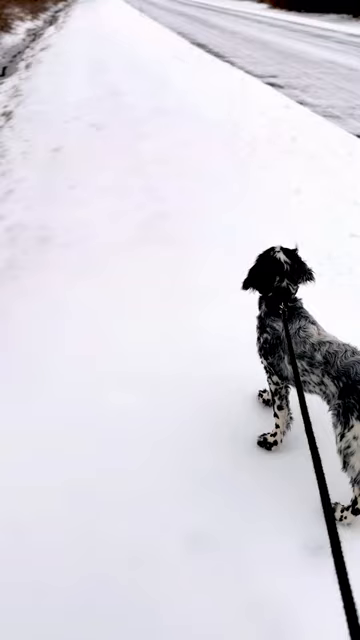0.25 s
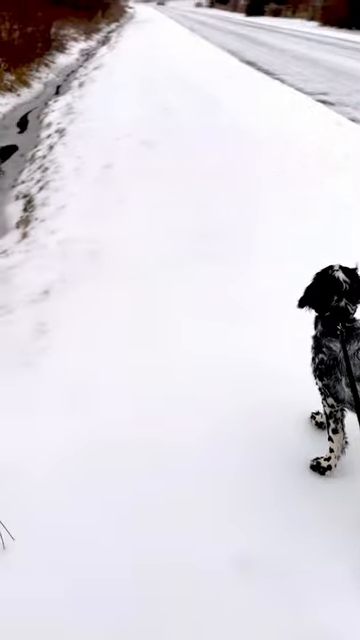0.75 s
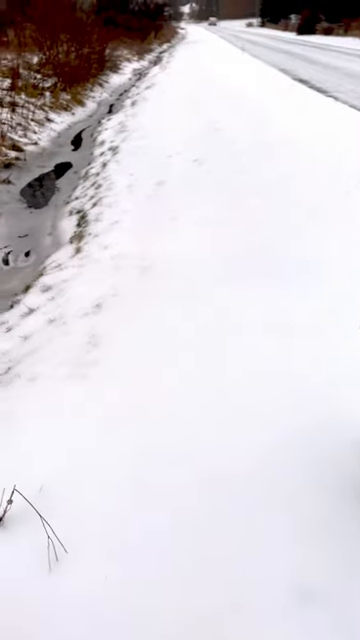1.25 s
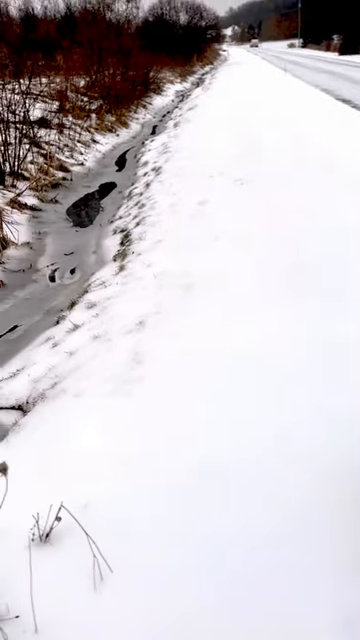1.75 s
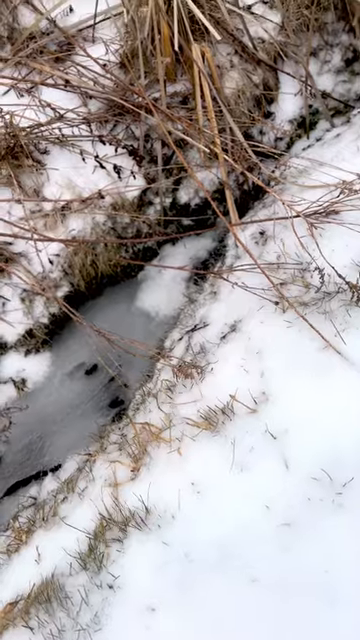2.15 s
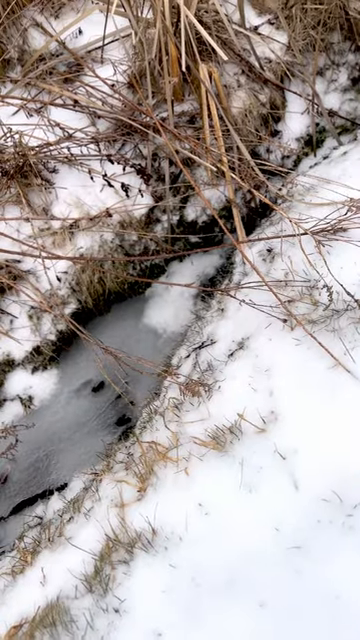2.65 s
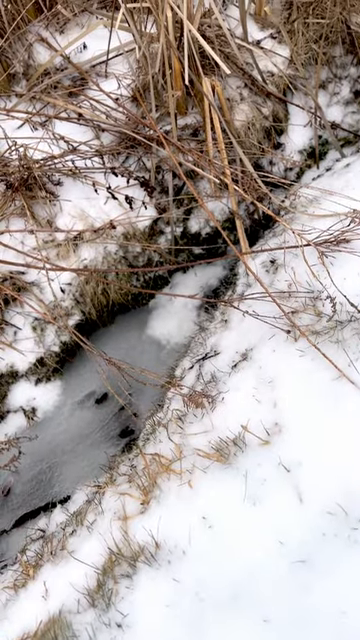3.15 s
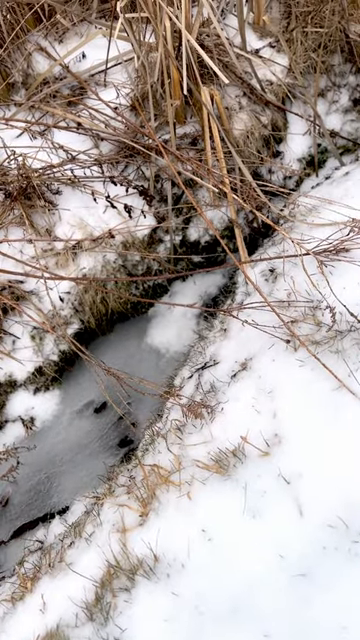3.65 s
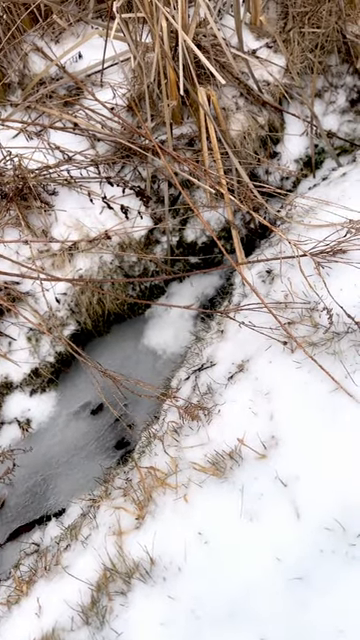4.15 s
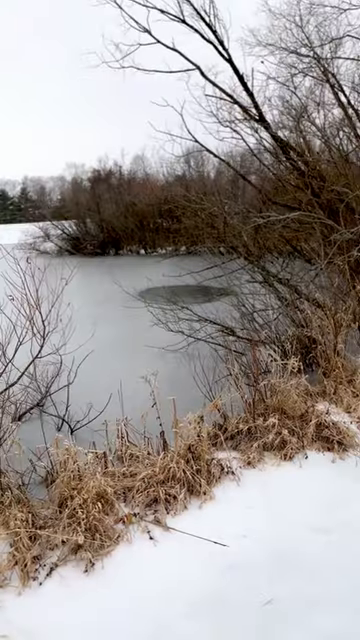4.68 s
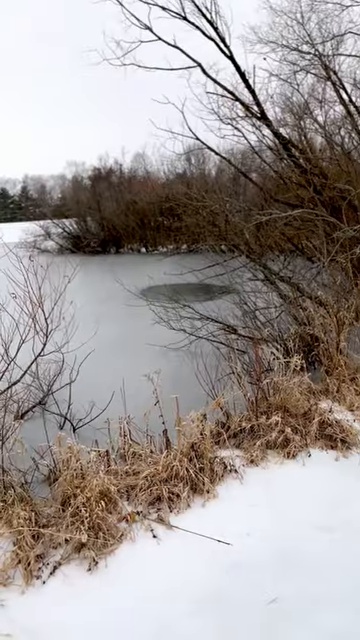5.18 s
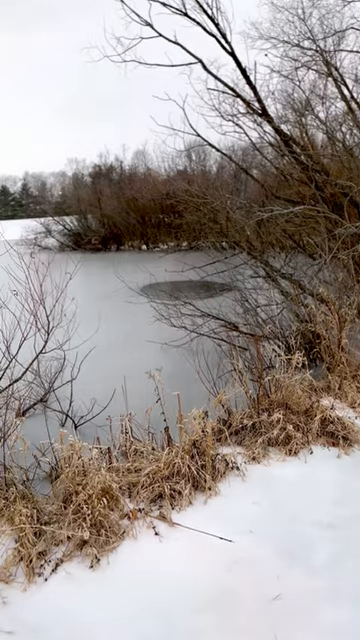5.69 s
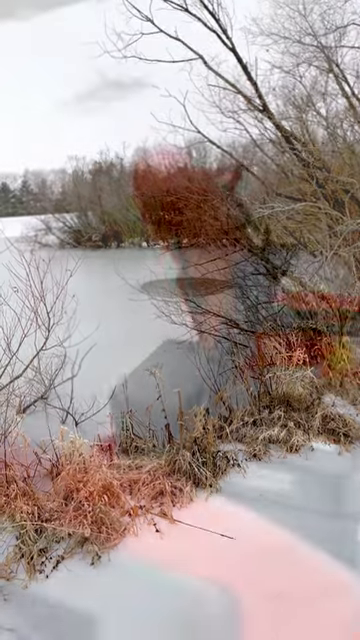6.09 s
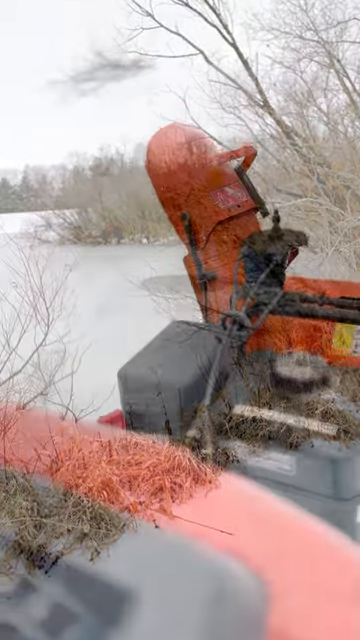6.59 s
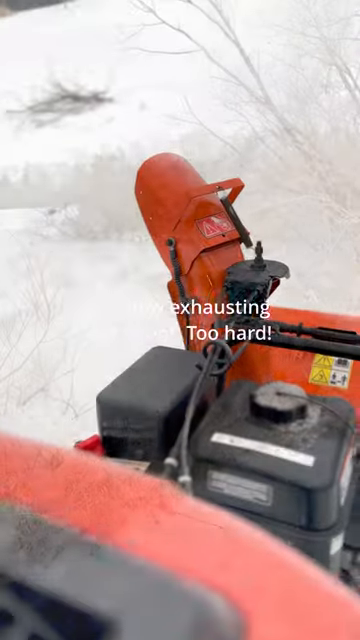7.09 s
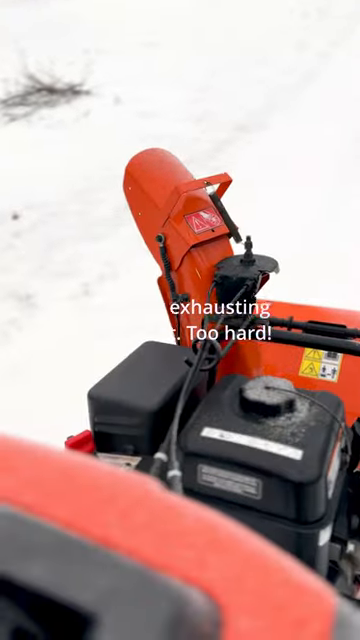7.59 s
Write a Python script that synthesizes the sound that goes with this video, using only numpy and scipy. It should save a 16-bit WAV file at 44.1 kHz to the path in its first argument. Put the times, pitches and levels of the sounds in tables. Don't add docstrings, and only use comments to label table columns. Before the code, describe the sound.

Low wind gusts and faint birds give way to busy water dripping, near silence with faint crunches, then an abrupt steady gasoline engine roar.

```python
import sys
import numpy as np
from scipy import signal
from scipy.fft import rfft, irfft, next_fast_len
from scipy.io import wavfile
from scipy.ndimage import uniform_filter1d

SR = 44100
rng = np.random.default_rng(int(sys.argv[2]) if len(sys.argv) > 2 else 0)


def field_ratio(decibels):
    return 10 ** (np.asarray(decibels, dtype=float) / 20)


def to_wav(sig):
    pcm = np.clip(np.atleast_2d(sig), -1, 1) * 32767
    pcm = np.round(pcm).astype(np.int16)
    wavfile.write(sys.argv[1], SR, pcm.T)


N = 345303
T = np.arange(N) / SR
CUTS_S = [
    1.822,
    4.318,
    6.5545,
]

EXHAUST_ORDERS_DB = [-48, -2.5, -5, -0.5, 0, 1, -4.5, 1.5, 1.5, -5, -23.5, -21.5, -21.5, -15, -12, -10.5,
                     -19.5, -17.5]
# frequency in Hz, level in dB.
ROAR = [(15, -28), (40, -16), (80, -17.5), (140, -4), (250, -7.5), (330, -23), (500, -41.5)]
# place in cycle 0-1, level in dB, width in cycle 0-1.
VALVES = [
    (.2, 3.5, 0.06),
    (.65, 2, 0.02),
    (.95, -0.5, .06),
]
# frequency in Hz, level in dB, t60 in seconds.
CASING = [
    (834, -9.5, 0.045),
    (955, -10.5, 0.05),
    (1486, -6, 0.015),
    (2200, -16.5, 0.045),
    (6400, -30, .01),
]
# rows of frequency in Hz, level in dB; level in dB; rows of frequency in Hz, left-right likeness.
CLATTER = ([(190, -27.5), (330, -5.5), (369, -7), (443, -4), (579, -10), (921, -8.5), (1110, -10.5),
            (1570, -11.5), (2920, -15.5), (3860, -21.5), (4910, -26), (5570, -25.5), (7070, -24.5),
            (8860, -33), (9600, -35), (12400, -79.5)], 0, [(100, 0.76), (300, 0.57), (500, 0.59),
            (2000, 0.55), (4000, 0.41), (5600, .99), (9000, 0.94)])
# frequency in Hz, level in dB.
FAN = [(8000, -40.5), (8700, -3), (10800, -3), (11500, -49)]
# rows of frequency in Hz, left minus right in dB; rows of frequency in Hz, left lead in rad.
ENGINE_PORTS = ([(60, 1.5), (120, -0.5), (250, 1.5), (510, 7.5), (1050, 5.0), (2160, 0), (4420, 2),
                 (9050, 0)], [(0, -0.5), (690, 1.0), (950, 0.34), (2150, -0.2), (3960, 7.5), (4910, 3.5),
                 (5510, 5.5), (8180, 7.5), (9220, 4)])


def engine():
    firings_per_s, sag_from_s, sag_per_s, first_firing_s = 30.6, 7.17, .45, 6.566
    exhaust_db, clatter_db = -19.6, -26.6
    span_s = CUTS_S[2], 9
    rate = firings_per_s - sag_per_s * np.maximum(T - sag_from_s, 0)
    turns = np.cumsum(rate) / SR
    turns -= turns[round(first_firing_s * SR)]

    order = np.arange(len(EXHAUST_ORDERS_DB)) + 1
    swing = np.where(order > 6, -1, 1)
    signed = np.r_[0, field_ratio(EXHAUST_ORDERS_DB) * swing, 0]
    orders = np.r_[0, order, order[-1] + 1]
    pulse = late_lows(lambda hz: np.interp(hz / rate.max(), orders, signed))
    firings = beats(turns, jitter_s=.0002, uneven_db=1.4)
    exhaust = evened(signal.oaconvolve(firings, pulse)[2048:][:N])

    swell_db, knocks = np.zeros(N), np.zeros(N)
    for place, db, width in VALVES:
        from_place = (turns - place + .5) % 1 - .5
        swell_db += db * np.exp(-from_place ** 2 / width ** 2)
        knocks += field_ratio(db) * beats(turns - place, jitter_s=.00008, uneven_db=1.8)
    roar = air(ROAR, -9.3, [(60, 1), (250, .97)], span=span_s, patchy_db=2.5, size=2048)
    low = field_ratio(exhaust_db) * (exhaust + field_ratio(-0.5) * roar * field_ratio(.7 * swell_db))

    body = np.zeros(4000)
    for hz, db, t60 in CASING:
        add(body, 0, field_ratio(db) * ring(hz, t60, rise=0.00028))
    casing = evened(signal.oaconvolve(knocks, body)[:N])
    clatter = air(*CLATTER, span=span_s, patchy_db=1.17, flicker_db=0.83, size=512)
    clatter = clatter * field_ratio(swell_db - swell_db.mean())
    heard = ports(low + field_ratio(clatter_db) * (clatter + field_ratio(-9.5) * casing), *ENGINE_PORTS)
    fan = air(FAN, -46.5, span=span_s, flicker_db=3.0, size=512) * [[1], [-1]]
    return (heard + fan) * during(*span_s)


def beats(turns, jitter_s, uneven_db):
    at = np.flatnonzero(np.diff(np.floor(turns)))
    chance = rng.standard_normal((len(at), 2))
    train = np.zeros(N)
    at = at + (jitter_s * SR * chance[:, 0]).astype(int)
    train[np.clip(at, 0, N - 1)] = field_ratio(uneven_db * chance[:, 1])
    return train


# start in seconds, peak in dB, pitch in Hz.
PLOPS = [(1.83, -40, 470), (1.862, -36.5, 436), (1.911, -34, 467), (1.973, -36.5, 460), (2.04, -32.5, 486),
         (2.099, -50, 500), (2.176, -30.5, 513), (2.213, -36.5, 510), (2.248, -44.5, 530),
         (2.285, -53, 493), (2.297, -49, 510), (2.332, -49, 506), (2.385, -54, 506), (2.402, -46, 460),
         (2.442, -45, 471), (2.476, -39, 472), (2.488, -32.5, 500), (2.544, -51, 535), (2.58, -30.5, 503),
         (2.631, -39.5, 458), (2.694, -32.5, 442), (2.733, -49, 470), (2.772, -34.5, 463),
         (2.831, -34.5, 480), (2.868, -28.5, 478), (2.937, -32.5, 452), (2.981, -44.5, 433),
         (3.003, -49, 450), (3.031, -34.5, 436), (3.065, -45, 441), (3.11, -33.5, 425), (3.17, -37, 633),
         (3.206, -37, 439), (3.243, -47, 450), (3.288, -38, 428), (3.301, -35, 484), (3.327, -41, 466),
         (3.413, -40.5, 497), (3.443, -44, 503), (3.573, -35.5, 530), (3.625, -45, 493), (3.675, -53, 440),
         (3.7, -49, 463), (3.726, -47.5, 476), (3.791, -47, 490), (3.82, -45, 495), (3.847, -29, 503),
         (3.929, -54, 487), (3.97, -39, 513), (4.031, -49, 450), (4.076, -56, 530), (4.112, -41, 662),
         (4.156, -51, 468), (4.224, -47, 536), (4.268, -48, 515)]
# start in seconds, peak in dB, pitch in Hz.
PLINKS = [(1.907, -54, 958), (2.036, -48.5, 994), (2.172, -48, 821), (2.294, -47.5, 1020),
          (2.477, -41, 1040), (2.568, -42.5, 1013), (2.624, -44.5, 985), (2.764, -40, 1260),
          (2.865, -39.5, 875), (3.027, -48.5, 942), (3.064, -49, 1200), (3.168, -52, 821),
          (3.243, -44, 1040), (3.299, -54, 816), (3.413, -39, 867), (3.491, -56, 1050),
          (3.547, -45.5, 1290), (3.57, -45, 834), (3.732, -42, 1270), (3.788, -49, 1100),
          (3.844, -39.5, 945), (3.926, -48.5, 900), (3.961, -49, 1220), (4.005, -54, 1010),
          (4.029, -49, 821), (4.11, -46, 850), (4.221, -48, 837), (4.256, -44, 1060)]
# start in seconds, peak in dB, pitch in Hz.
BEADS = [(1.8488, -50, 2090), (1.9196, -49.5, 2350), (1.9326, -44, 2280), (1.9954, -55, 2400),
         (1.9954, -49, 1730), (2.0992, -57, 2230), (2.1531, -53, 2260), (2.217, -49, 2230),
         (2.346, -50, 1720), (2.4833, -54, 2200), (2.5408, -54, 2420), (2.7258, -59, 2240),
         (2.7462, -57, 2230), (2.7627, -54, 1620), (2.8645, -53, 1720), (2.9024, -49, 2230),
         (2.928, -51, 1640), (2.9557, -53, 2280), (3.0016, -57, 2250), (3.051, -49, 2260),
         (3.2356, -48, 2270), (3.3035, -60, 1650), (3.3369, -58, 1540), (3.3718, -52, 2250),
         (3.385, -47, 2200), (3.4127, -37.5, 2180), (3.4711, -49, 1650), (3.5379, -55, 1700),
         (3.5526, -50, 1650), (3.5913, -54, 1660), (3.6896, -45.5, 1720), (3.729, -50, 1630),
         (3.816, -49.5, 1850), (3.8372, -44, 1820), (4.0064, -52, 1700), (4.254, -53, 2230)]
# start in seconds, peak in dB, pitch in Hz.
TICKS = [(1.9316, -48, 4280), (1.9321, -43, 2500), (2.0563, -52, 2720), (2.0982, -44, 3040),
         (2.171, -48, 4000), (2.2139, -49, 3250), (2.294, -57, 2970), (2.439, -46, 2940),
         (2.4813, -53, 2950), (2.5362, -49, 4330), (2.5412, -45, 2460), (2.5616, -45, 2870),
         (2.5901, -50, 3190), (2.7727, -43, 3440), (2.7804, -40.5, 3320), (2.8635, -55, 2770),
         (2.8744, -47, 2960), (2.8944, -47, 2920), (2.9358, -53, 2410), (2.9358, -48, 2810),
         (3.0336, -45, 2900), (3.0503, -42.5, 2760), (3.0874, -49, 2900), (3.1254, -51, 2900),
         (3.1428, -47, 2930), (3.168, -49, 2970), (3.207, -45.5, 3340), (3.2622, -44.5, 2950),
         (3.3144, -60, 3700), (3.3144, -52, 3320), (3.3474, -54, 3470), (3.3474, -43, 3800),
         (3.41, -52, 2700), (3.4476, -46, 3860), (3.4701, -49, 3480), (3.506, -47, 2950),
         (3.5484, -49, 3200), (3.5948, -53, 2690), (3.6577, -53, 2670), (3.6861, -43.5, 2490),
         (3.7027, -40.5, 2920), (3.8143, -54, 2690), (3.8426, -51, 2820), (3.8602, -50, 2920),
         (3.9265, -46, 3230), (4.0957, -47, 3230), (4.117, -49, 2440), (4.156, -48, 2920),
         (4.261, -40.5, 2950), (4.294, -41.5, 3250)]
# start in seconds, peak in dB, pitch in Hz.
SPRAY = [(1.8266, -45.5, 8080), (1.8837, -49, 4710), (1.912, -40, 5330), (1.9393, -42, 6110),
         (2.0104, -49, 6710), (2.0743, -44, 4700), (2.1638, -42.5, 7960), (2.2439, -45, 9000),
         (2.3222, -47, 4800), (2.3746, -55, 4840), (2.4025, -49, 4740), (2.4768, -49, 6300),
         (2.5372, -47, 5160), (2.5376, -45, 4900), (2.5941, -49, 5600), (2.7328, -45.5, 9260),
         (2.864, -41, 5600), (2.9358, -59, 5700), (3.065, -53.5, 4870), (3.135, -48, 9000),
         (3.1678, -45.5, 6100), (3.2151, -46, 5500), (3.2161, -35.5, 4770), (3.2351, -52, 5780),
         (3.2621, -42, 4880), (3.3015, -33.5, 8080), (3.3693, -50, 4850), (3.385, -47, 8440),
         (3.4127, -39.5, 8400), (3.5669, -47.5, 10800), (3.6008, -50, 6400), (3.6242, -51, 8350),
         (3.6382, -49, 5370), (3.6856, -46, 4380), (3.6856, -43.5, 9180), (3.704, -45, 7980),
         (3.724, -47, 7010), (3.7574, -42, 5970), (3.782, -49, 5700), (3.8846, -52, 6590),
         (3.8846, -45, 5170), (3.9235, -45, 5400), (4.0213, -50, 4840), (4.0368, -43, 4670),
         (4.1914, -51, 4860), (4.2603, -62, 4400), (4.2603, -46, 4780), (4.2728, -40.5, 9640)]
# rows of frequency in Hz, level in dB; level in dB; rows of frequency in Hz, left-right likeness.
DITCH_AIR = ([(120, -49), (200, -33), (309, -17.5), (486, -2.5), (600, -9), (1320, -14.5), (1480, -30),
              (1660, -16), (1950, -20), (2920, -11), (3400, -12.5), (4100, -26), (4900, -16.5),
              (5760, -19.5), (9500, -23), (12400, -34)], -58, [(100, .95), (500, 0.36), (3000, 0.55),
              (8000, 0.31)])
# rows of frequency in Hz, left minus right in dB; rows of frequency in Hz, left lead in rad.
DITCH_PORTS = ([(60, -8), (160, 3), (450, 0), (1220, -7), (3320, 1), (9050, 0.5)], [(0, 0.5), (780, 0.91),
                (1890, -0.7), (3700, -2), (4650, -1), (5770, -1), (7320, 1.4), (9220, -1.5)])


def ditch():
    overtone, overtone_db = 1.286, -6
    out = np.zeros(N)
    for s, db, hz in PLOPS:
        add(out, s, field_ratio(db + overtone_db) * ring(hz * overtone, 0.028, rise=0.0024))
        add(out, s, field_ratio(db - 1.1) * ring(hz, 0.032, rise=0.0021, glide=-0.026))
        add(out, s + 0.00918, field_ratio(db - 16) * ring(hz * 1.03, 0.065, rise=0.004))
    for s, db, hz in PLINKS + BEADS:
        add(out, s, field_ratio(db - 2.5) * ring(hz, 1.35 / hz ** .5, rise=0.0018, glide=0.027))
        add(out, s, field_ratio(db - 10) * puff(hz, 0.014, spread=0.5))
    for s, db, hz in TICKS:
        add(out, s, field_ratio(db - 3.0) * ring(hz, 0.032, rise=0.001))
        add(out, s, field_ratio(db - 9.5) * puff(hz, 0.014, spread=0.23))
    for s, db, hz in SPRAY:
        add(out, s - .001, field_ratio(db - 9.5) * puff(hz, 0.0065, spread=0.24))
        add(out, s, field_ratio(db - 7) * ring(hz, 0.015, rise=0.00048))
    wash = air(*DITCH_AIR, span=CUTS_S[:2], patchy_db=4.5, flicker_db=2.2, size=256)
    return ports(out + patter() + wash, *DITCH_PORTS) * during(*CUTS_S[:2])


def patter():
    level_db, drops_per_s = -65.5, 500
    first, last = (round(s * SR) for s in CUTS_S[:2])
    count = last - first
    size = field_ratio(6.9 * np.minimum(rng.exponential(1, count), 3.))
    size *= rng.random(count) < drops_per_s / SR
    kind = rng.integers(0, 16, count)
    out = np.zeros((2, N))
    for k, hz in enumerate(np.geomspace(420, 11500, 16)):
        grain = ring(hz, 13 / hz ** 0.81, rise=0.00023)
        grain *= field_ratio(read(DITCH_AIR[0], hz) + 2.9 * np.log2(hz / 1000))
        grains = signal.oaconvolve(size * (kind == k), grain)[:count]
        out[:, first:last] += np.array([grains, np.roll(grains, rng.integers(-4, 5))])
    return field_ratio(level_db) * evened(out)


# time in seconds, rumble in dB.
BREEZE = [(0, -47), (.7, -56.5), (1.55, -64), (1.82, -53.5), (4.3, -53.5), (5.15, -58), (5.21, -65.5),
          (6.55, -55.5)]
# middle in seconds, half length in seconds, rumble in dB, flutter over the rumble in dB.
GUSTS = [(0.035, 0.053, -37.5, -4), (0.131, 0.062, -35.5, -13.5), (0.229, 0.054, -35.5, -5),
         (0.32, 0.049, -40.5, -3), (0.432, 0.089, -40, -1), (1.124, 0.033, -42, -10),
         (1.229, 0.087, -42.5, -5.5), (4.38, 0.067, -45.5, -17), (4.553, 0.097, -38, -30),
         (4.81, .15, -38, -26), (5.07, 0.086, -42.5, -12.5)]
# frequency in Hz, level in dB.
RUMBLE = [(10, -43), (30, -7.5), (60, 7), (100, -2), (130, -6.5), (200, -78)]
# frequency in Hz, level in dB.
FLUTTER = [(70, -47), (120, 0.5), (170, -2.5), (260, -11.5), (400, -21.5), (700, -43), (1500, -83)]
# time in seconds, peak in dB, top in Hz.
THUMPS = [(.285, -25.5, 800), (3.415, -32, 1200), (4, -38.5, 230), (4.465, -34, 156), (4.68, -27, 233),
          (4.772, -32.5, 165), (5.083, -31.5, 240), (1.2, -39, 250), (.21, -34, 350)]


def wind():
    rumble = field_ratio(*curves(BREEZE))
    flutter = field_ratio(-9) * rumble
    for middle, half, db, bright_db in GUSTS:
        swell = field_ratio(db) * np.clip(1 - ((T - middle) / half) ** 2, 0, 1)
        rumble = rumble + swell
        flutter = flutter + field_ratio(bright_db) * swell
    near_mono = [(60, 0.99), (300, 0.95)]
    span_s = 0, CUTS_S[2]
    out = rumble * air(RUMBLE, 0, near_mono, span=span_s, patchy_db=1.5, size=4096)
    out += flutter * air(FLUTTER, 0, near_mono, span=span_s, patchy_db=3.5, flicker_db=4.5, size=1024)
    for s, db, top_hz in THUMPS:
        push = late_lows(lambda hz: (hz / 90) ** 2 / (1 + (hz / 90) ** 3.1) / (1 + (hz / top_hz) ** 6))
        onset = 2048 + np.argmax(abs(push[2048:]) > .3 * push.max())
        add(out.T, s - onset / SR, field_ratio(db) * push[:, None] / abs(push).max())
    return out


# start in seconds, peak in dB, pitch in Hz.
CRUNCHES = [(4.343, -66.5, 3470), (4.789, -62, 3200), (4.958, -69.5, 2790), (5.176, -61, 2880),
            (5.499, -63, 3040), (5.846, -60, 2840), (6.0896, -67.5, 2920), (6.1694, -69, 2660),
            (6.206, -66, 3080), (6.44, -61.5, 3380)]
# start in seconds, peak in dB, pitch in Hz.
SNAPS = [
    (5.755, -62, 4320),
    (5.7904, -46, 1940),
    (5.805, -56, 1560),
]
# rows of frequency in Hz, level in dB; level in dB; rows of frequency in Hz, left-right likeness.
POND_AIR = ([(110, -32), (180, -6.5), (255, -6.5), (562, -11.5), (1300, -25), (2200, -21), (2950, -29),
             (3700, -23.5), (5140, -37.5), (7950, -33), (9500, -71), (12400, -90)], -67.5, [(100, 1),
             (500, 0.36), (3000, 0.19), (8000, 0.44)])
# rows of frequency in Hz, left minus right in dB; rows of frequency in Hz, left lead in rad.
POND_PORTS = ([(60, 0.67), (9050, 0.0)], [(0, -0.5), (2070, 6.5), (5510, -7), (5770, -14.5), (9220, -5)])


def pond():
    crunch_s = .035
    out = np.zeros(N)
    for s, db, hz in CRUNCHES:
        add(out, s, field_ratio(db - 3) * puff(hz, crunch_s, spread=.26))
        add(out, s, field_ratio(db - 10.5) * puff(hz * 0.37, crunch_s, spread=0.61))
    for s, db, hz in SNAPS:
        add(out, s, field_ratio(db) * ring(hz, 0.0082, rise=0.00017))
        add(out, s, field_ratio(db - 14) * puff(4400, 0.013, spread=0.36))
    still = ports(air(*POND_AIR, span=CUTS_S[1:], patchy_db=2.5), *POND_PORTS)
    return (out + still) * during(*CUTS_S[1:])


# start in seconds, length in seconds, first Hz, last Hz, level in dB.
CHIRPS = [
    (1.009, 0.13, 6730, 6600, -80),
    (1.299, 0.018, 5880, 7870, -58.5),
    (1.462, .035, 6000, 7300, -78),
]
# fuzz in Hz, waver in Hz, echo in dB, echo t60 in seconds.
CHIRP_VOICE = (60, 18, -3, 0.3)
# start in seconds, length in seconds, first Hz, last Hz, level in dB.
SQUEALS = [
    (1.22, .2, 4980, 5000, -77),
    (1.4, .07, 4980, 4850, -81),
    (1.23, .22, 2490, 2480, -74),
    (1.42, .4, 2440, 2560, -74),
    (.31, 0.85, 2660, 2600, -77),
]
# fuzz in Hz, waver in Hz, echo in dB, echo t60 in seconds.
SQUEAL_VOICE = (80, 30, -10, .1)


def birds():
    out = np.zeros(N)
    calls = [(*row, *CHIRP_VOICE) for row in CHIRPS]
    calls += [(*row, *SQUEAL_VOICE) for row in SQUEALS]
    for start, length, first_hz, last_hz, db, fuzz_hz, waver_hz, echo_db, t60 in calls:
        count = int(length * SR)
        fuzz_pole = np.exp(-2 * np.pi * fuzz_hz / SR)
        fuzz = evened(signal.lfilter([1], [1, -fuzz_pole], rng.standard_normal(SR))[-count:])
        waver = waver_hz * evened(uniform_filter1d(rng.standard_normal(SR), size=2000))[:count]
        pitch_hz = np.linspace(first_hz, last_hz, count) + waver
        tone = np.sin(2 * np.pi * np.cumsum(pitch_hz) / SR)
        note = field_ratio(db + 3) * tone * (.8 + .7 * fuzz) * signal.windows.tukey(count, .4)
        tail = rng.standard_normal(20000) * field_ratio(-60 * np.arange(20000) / SR / t60)
        echo = signal.fftconvolve(note, tail / np.linalg.norm(tail))
        add(out, start, note)
        add(out, start, field_ratio(echo_db) * echo * np.sqrt(t60 / length / 14))
    return out


# rows of frequency in Hz, level in dB; level in dB; rows of frequency in Hz, left-right likeness.
ROAD_AIR = ([(150, -55), (340, -4), (467, -4), (819, -5), (1810, -17.5), (2610, -13.5), (3200, -23),
             (3650, -16), (4450, -18), (5200, -36), (6200, -24), (9500, -43), (12400, -76)],
             -65.5, [(100, 0.77), (500, 0.13), (3000, 0.32), (8000, 0.76)])
# rows of frequency in Hz, left minus right in dB; rows of frequency in Hz, left lead in rad.
ROAD_PORTS = ([(60, 0.5), (9050, 0.061)], [(0, 2), (2240, 0.3), (3010, -3.5), (3700, -1), (5430, -7.5),
               (5680, 2.5), (9220, -4)])


def roadside():
    tyres_s, tyres_db, rise_db_per_s = 1.39, -66.5, 4
    colour = [(1200, -30), (1700, -11), (2450, 2.5), (2850, -29)]  # Hz, dB
    tyres = air(colour, -1.4, ROAD_AIR[2], span=(tyres_s, CUTS_S[0]))
    add(tyres.T, tyres_s, field_ratio(1.5) * puff(1660, 0.045, spread=.35)[:, None])
    tyres = field_ratio(tyres_db + rise_db_per_s * (T - tyres_s)) * tyres
    still = air(*ROAD_AIR, span=(0, CUTS_S[0]))
    return ports(still + tyres, *ROAD_PORTS) * during(-1, CUTS_S[0])


def air(colour, db=0, same=((1, 1), (2, 1)), *, span, patchy_db=1.5, flicker_db=0, size=1024):
    first, last = round(span[0] * SR), min(round(span[1] * SR), N)
    frames = (last - first) * 4 // size + 5
    hz = np.fft.rfftfreq(size, 1 / SR)
    a, b, c, d, chance = rng.standard_normal((frames, len(hz), 5)).T
    flicker = uniform_filter1d(uniform_filter1d(chance, size=60, axis=0), size=2, axis=1)
    patches = uniform_filter1d(uniform_filter1d(chance, size=12, axis=0), size=10, axis=1)
    like = np.clip(read(same, hz), -1, 1)[:, None]
    left = a + 1j * b
    z = np.array([left, like * left + np.sqrt(1 - like ** 2) * (c + 1j * d)])
    z *= field_ratio(read(colour, hz)[:, None] + patchy_db * evened(patches) + flicker_db * evened(flicker))
    x = signal.istft(z, nperseg=size, noverlap=size * 3 // 4)[1][:, :last - first]
    return field_ratio(db) * np.pad(evened(x), ((0, 0), (first, N - last)))


def ring(hz, t60, rise=0.0016, glide=0.):
    t = np.arange(int(t60 * SR)) / SR
    tone = np.sin(2 * np.pi * hz * t * (1 + glide * t / t60))
    x = (1 - np.exp(-t / rise)) * field_ratio(-60 * t / t60) * tone
    return x / abs(x).max()


def puff(hz, length, spread):
    edges_hz = [hz * (1 - spread), min(hz * (1 + spread), SR * .4)]
    band = signal.butter(3, edges_hz, "bandpass", fs=SR)
    u = np.arange(int(length * SR)) / (length * SR)
    noise = signal.lfilter(*band, rng.standard_normal(3000))[-len(u):]
    return evened(noise) * np.sin(np.pi * u ** 0.45) ** 2


def late_lows(gain, size=8192):
    lag_turns = 1.71
    hz = np.fft.rfftfreq(size, 1 / SR)
    lag = np.exp(-2j * np.pi * lag_turns * np.log((hz + 1) / 44.5))
    return np.roll(irfft(gain(hz) * lag), size // 4)


def ports(x, balance, lead):
    size = next_fast_len(N)
    hz = np.fft.rfftfreq(size, 1 / SR)
    tilt = field_ratio(read(balance, hz) / 2)
    lead_rad = np.interp(hz, *np.transpose(lead)) * np.minimum(hz / 400, 1)
    return irfft(rfft(x, size) * [tilt, np.exp(-1j * lead_rad) / tilt], size)[:, :N]


def evened(x):
    return x / np.sqrt(np.mean(x ** 2) + 1e-20)


def read(points, hz):
    f, value = np.transpose(points)
    return np.interp(np.log(hz + 1), np.log(f + 1), value)


def curves(rows):
    s, *columns = np.transpose(rows)
    return [np.interp(T, s, c) for c in columns]


def during(start, end):
    return np.clip(np.minimum(T - start, end - T) / 0.00042, 0, 1)


def add(mix, s, sound):
    part = mix[round(s * SR):][:len(sound)]
    part += sound[:len(part)]


# start in seconds, end in seconds, level in dB.
DROPOUT = ((3.283, 3.299, -17))


def scene():
    quiet = (wind() + birds()) * during(-1, CUTS_S[2]) + roadside() + ditch() + pond()
    start, end, gap_db = DROPOUT
    return quiet * (1 - (1 - field_ratio(gap_db)) * during(start, end)) + engine()


def low_pass(x):
    return signal.sosfilt(signal.butter(12, 12000, fs=SR, output="sos"), x)


def record(dry):
    return low_pass(dry)


dry = scene()
out = record(dry)
to_wav(out)
```